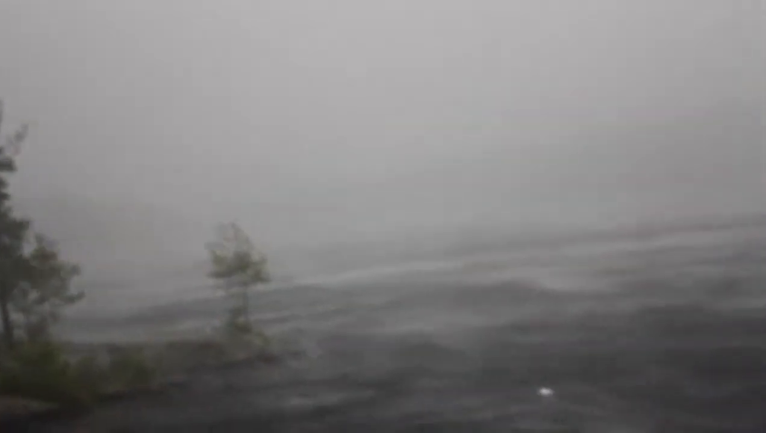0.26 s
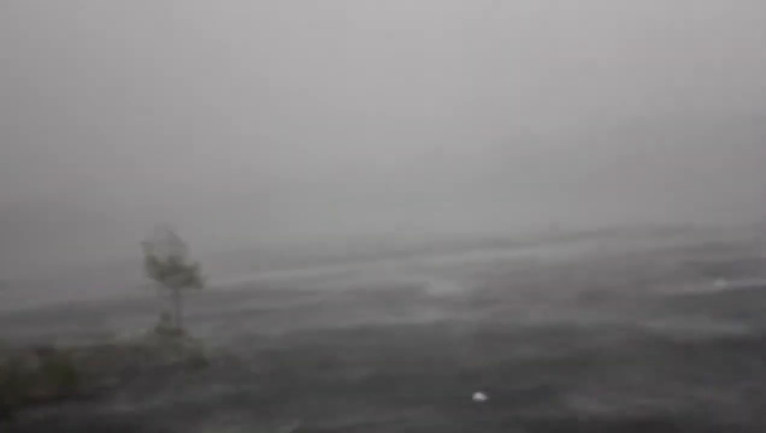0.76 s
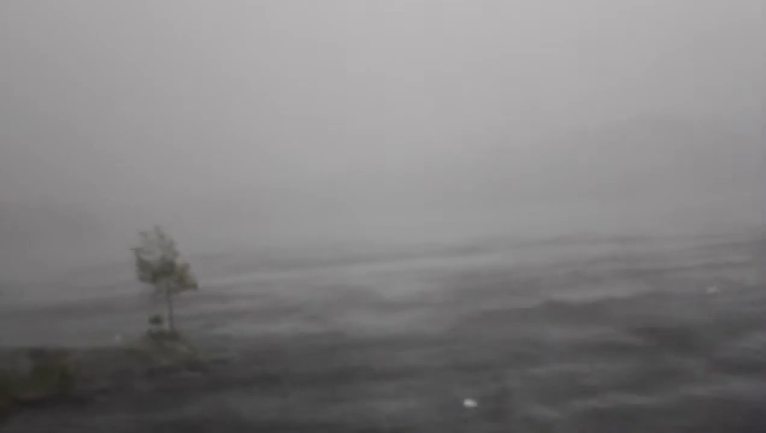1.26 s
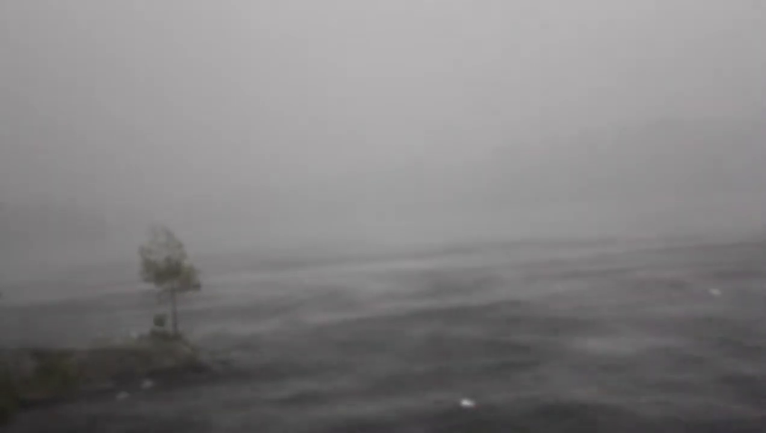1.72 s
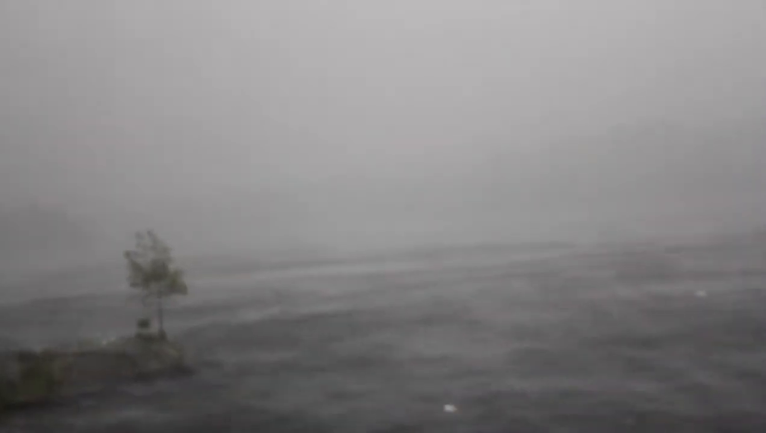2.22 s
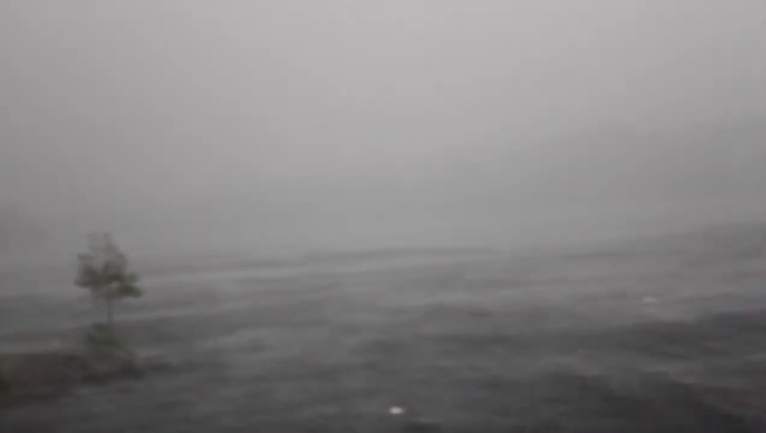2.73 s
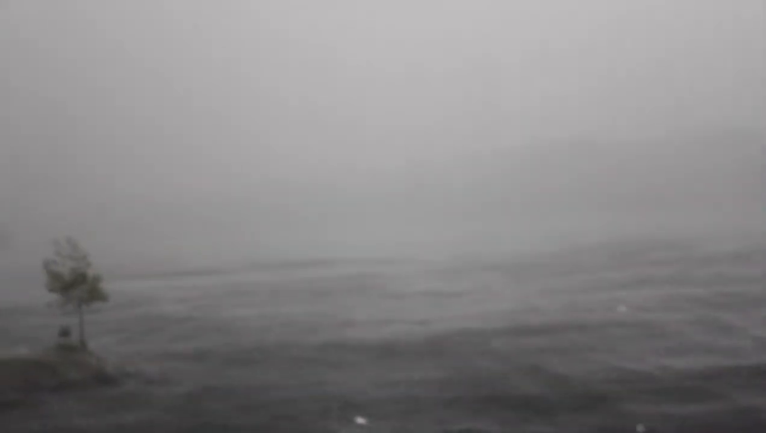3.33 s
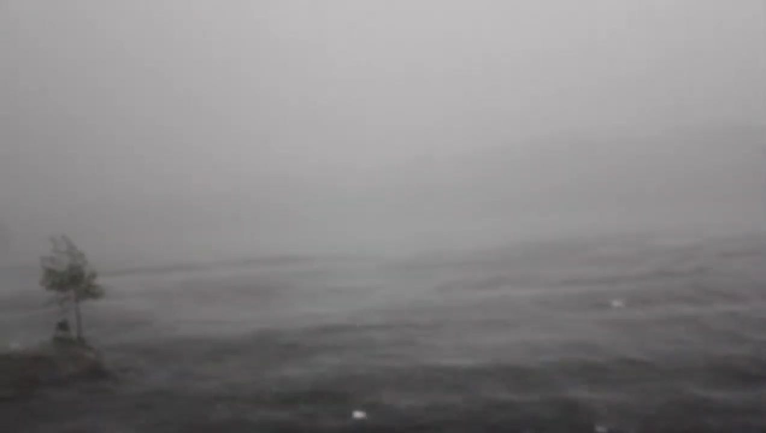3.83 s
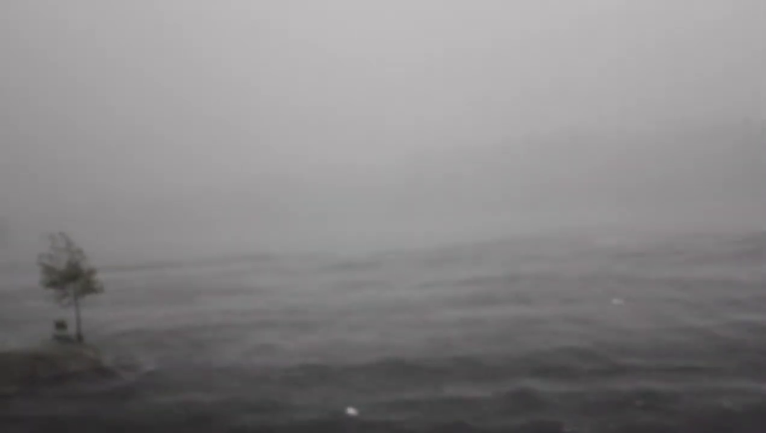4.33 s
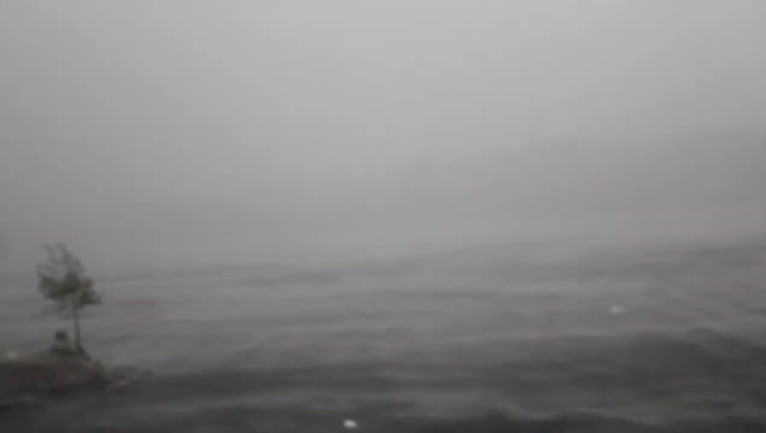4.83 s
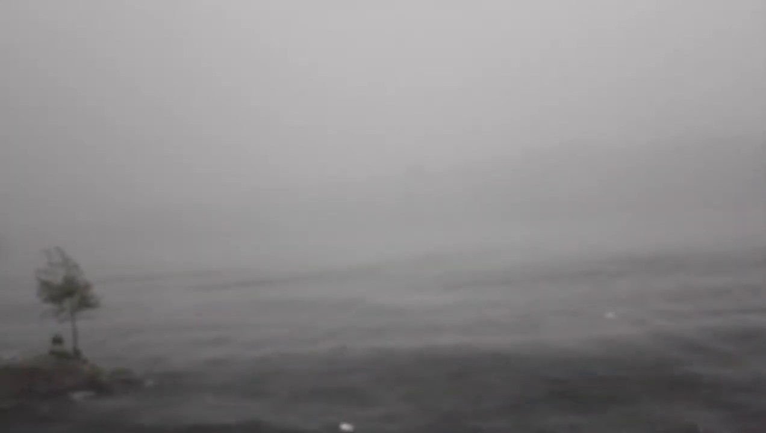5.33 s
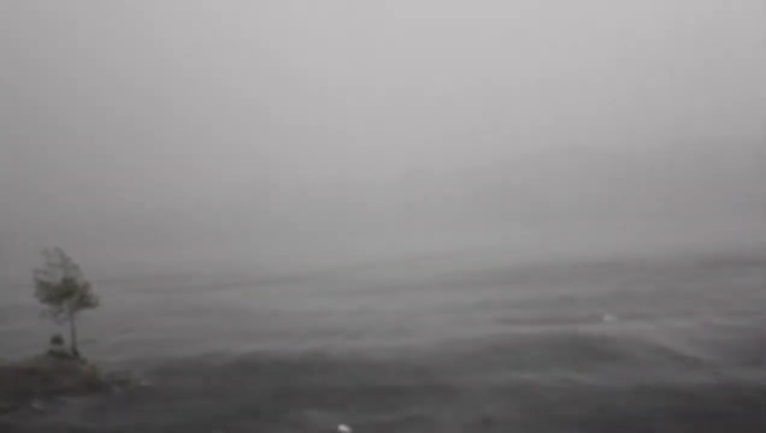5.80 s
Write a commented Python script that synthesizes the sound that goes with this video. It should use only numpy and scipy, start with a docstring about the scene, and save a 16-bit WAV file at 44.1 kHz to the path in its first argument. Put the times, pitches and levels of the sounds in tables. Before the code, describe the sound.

A bright, dense downpour comes in uneven sheets, with hard wet ticks near a single sheltered microphone. Low thunder bumps from the start, grows quickly and keeps rumbling, boomy with a rough muffled rattle. At about three seconds the rain falls away to a faint hiss with sparse tiny ticks, leaving thunder in front, rising and falling until the end without a final clap.

```python
"""Heavy, gusty rain opens loud, with a cluster of near drops ticking in the first second. Thunder starts low,
thumps from the outset and swells from about 0.8 s; sparser drops return after 2 s. Around 3 s the rain is heard
well back under the thunder, which rolls on in swells to the end. Rain is shaped noise with ringing impulses,
near drops are cracks with spray, thumps are short swings of pressure, and thunder is random shock fronts plus
noise in three bands. One microphone feeds both channels."""
import sys
import numpy as np
from scipy import signal
from scipy.fft import rfft, irfft, next_fast_len
from scipy.io import wavfile

SR = 44100
rng = np.random.default_rng(int(sys.argv[2]) if len(sys.argv) > 2 else 0)


def generate_wav(sig):
    """Save sig (samples, or channels by samples) to the path in sys.argv[1] as 16-bit PCM at SR."""
    pcm = np.round(np.clip(np.atleast_2d(sig).T, -1, 1) * 32767).astype(np.int16)
    wavfile.write(sys.argv[1], SR, pcm)


N = 267246  # length in samples

# Level at which the rain is heard: t/s, level/dB
RAIN_LEVEL = [(0.0, -17.5), (0.15, -21), (0.19, -24.5), (0.41, -17.5), (0.5, -22), (0.6, -21),
              (0.66, -20.5), (0.73, -19), (0.8, -21), (0.95, -23), (1.16, -21), (1.28, -27.5), (1.5, -24),
              (1.97, -24), (2.12, -20.5), (2.36, -24.5), (2.5, -21), (2.6, -28.5), (2.95, -24), (3.04, -34),
              (3.14, -30.5), (3.2, -36), (3.33, -33), (3.4, -35.5), (3.8, -39), (4.0, -36), (4.22, -33.5),
              (4.56, -36), (4.74, -33.5), (5.0, -38.5), (5.08, -36), (5.67, -31.5), (5.77, -33),
              (6.06, -29)]
# Spectrum of the rain: f/Hz, density per Hz/dB
RAIN_SPECTRUM = [(150, -20), (400, -17.5), (1000, -1.5), (2000, -3), (3500, -3.5), (5500, -5), (7500, -7),
                 (12000, -7), (15500, -11)]
# Near drops: start t/s, crack level/dB, ring f/Hz, ring level over the crack/dB
NEAR_DROPS = [(0.013, -8, 3600, 0), (0.0686, -7, 5210, -3), (0.154, 2, 4040, -7), (0.1585, 2, 4200, -10),
              (0.3969, -11, 3990, 0), (0.419, -2, 3300, -9), (0.5346, -13.5, 2900, 7),
              (0.5803, -1, 3820, -4), (0.602, -7, 7010, 3), (0.721, -2, 3820, -1), (0.738, -4, 6000, -1),
              (0.79, -12, 4480, -6), (0.9063, 0, 8480, -4), (0.9194, -6, 12000, 1),
              (2.1265, -19, 3060, -10), (2.4612, -13, 3750, 0), (2.5096, -13, 3960, 3),
              (2.547, -2, 4090, -5), (2.674, -16, 3590, 7.5), (2.785, -8, 4060, -2),
              (3.0938, -22, 5570, -2), (3.3656, -20, 4360, -4), (4.228, -12, 3110, -10),
              (4.6827, -12, 5040, -5), (4.8503, -21, 3910, -5), (5.0383, -26, 3150, 3.5),
              (5.044, -24, 4200, 6), (5.2315, -19, 5720, -4), (5.441, -14, 4340, -8)]
# Single shock fronts that stand out of the roll: t/s, level/dB, f/Hz, length/cycles
SHOCK_FRONTS = [(0.085, -5.5, 145, 1.75), (0.249, -9.5, 172, 1.34), (0.39, -10.5, 164, 1.6),
                (0.423, -6, 178, 2.4), (0.461, 3, 288, 1.8), (0.503, -10.5, 414, 2.5),
                (0.555, -9, 153, 1.35), (0.674, -7, 248, 1.2), (0.76, -10, 200, 4), (1.208, 1, 127, 1.5),
                (1.219, -13, 483, 2), (1.232, -2.5, 168, 3.9), (1.508, -13, 200, 2.3),
                (1.574, -14, 180, 2.5), (1.655, -10, 202, 7.5), (1.853, -9, 210, 8.9),
                (2.274, -8, 138, 1.4), (2.315, -10.5, 205, 9.2), (2.439, -10, 217, 5),
                (2.46, -11, 202, 4.2), (2.512, -5.5, 203.4, 6.6), (2.962, -5, 130, 3.3),
                (3.015, -1, 180, 3.2), (3.129, -5, 183, 3.5), (3.184, -5, 191, 3), (3.348, -3, 172, 1.7),
                (3.452, -12, 92, 2.5), (3.543, -9, 175, 2.5), (3.696, -5, 200, 2.4),
                (3.706, -11, 75.4, 3.6), (3.712, -7, 219, 5.3), (3.716, -9, 636, 2.4),
                (3.784, -12, 75, 1.8), (3.911, -3, 112, 1.6), (3.915, -33, 620, 2.3), (4.237, -7, 142, 3.9),
                (4.419, -9, 205, 4.5), (4.473, -11, 110, 3.3), (4.782, -7, 110, 2.4), (4.951, -6.5, 404, 4),
                (5.131, -11, 186, 1.5), (5.611, -10, 163, 2.5), (5.734, -9, 198, 2.9)]
# The roll of thunder: t/s, boom level/dB, rattle level/dB
THUNDER_ROLL = [(0.0, -34, -26.5), (0.2, -33.5, -31.5), (0.46, -26, -28.5), (0.68, -29.5, -30.5),
                (0.78, -17.5, -19), (1.11, -27, -22.5), (1.23, -16.5, -16), (1.29, -29.5, -27),
                (1.55, -19.5, -22.5), (1.85, -17.5, -21), (2.1, -26.5, -25.5), (2.17, -20.5, -17),
                (2.32, -18.5, -20), (2.4, -26, -26.5), (2.56, -21.5, -27.5), (2.62, -32, -31.5),
                (2.9, -23, -22), (2.99, -14, -17), (3.09, -17.5, -20), (3.16, -17, -16.5),
                (3.55, -15, -16.5), (3.67, -23, -20), (3.74, -18, -18), (4.02, -23.5, -23.5),
                (4.18, -21, -20.5), (4.25, -14.5, -17.5), (4.52, -18.5, -21), (4.59, -22, -22),
                (4.82, -16.5, -16), (5.04, -21, -20.5), (5.14, -15.5, -20), (5.42, -18.5, -20),
                (5.72, -14.5, -19.5), (5.79, -24.5, -23), (5.92, -18.5, -19), (6.06, -24, -23.5)]
# Slow change of colour: t/s, rumble level over the boom/dB, nearness that brightens the rattle/0-1
THUNDER_REACH = [(0, -3.5, 0.5), (.8, -11, 0.56), (1.2, -4.5, 0.37), (1.8, -12.5, 0.46), (2.3, -3, 0.68),
                 (3.0, -9.5, 0.34), (3.8, -3, 0.29), (4.5, -5.5, .25), (5.3, -8, 0.27), (6.06, -10.5, .35)]
# Spectra of the three thunder bands: f/Hz, density per Hz/dB
RUMBLE_SPECTRUM = [(18, -48), (30, -18.5), (72, 6.5), (120, 7.5), (160, 1.5), (260, -120)]
BOOM_SPECTRUM = [(59, -35), (100, -1.5), (140, -7), (189, 8.5), (252, 3), (370, -9.5), (480, -34.5),
                 (810, -120)]
RATTLE_SPECTRUM = [(190, -39), (330, -1.5), (460, -3), (714, -4), (932, -11), (1420, -15.5), (2400, -32.5),
                   (3120, -44), (5280, -120)]

DROP_SPRAY = 0.52  # greatest spray tick against the crack
# The hollow around the microphone rings with the boom
SHELTER_HZ, SHELTER_CYCLES, SHELTER_DB = 192.2, 22, -13.5
# Random level movement of each thunder band: spread in dB, corner rate in Hz
RUMBLE_WANDER_DB, RUMBLE_WANDER_HZ = 2.2, 4.5
BOOM_HEAVE_DB, BOOM_HEAVE_HZ = 0.8, 12
RATTLE_HEAVE_DB, RATTLE_HEAVE_HZ = 0.82, 8.8
CUTOFF_HZ = 15250  # top of the microphone's range


def from_db(db):
    """Decibels become an amplitude factor."""
    return 10 ** (np.asarray(db) / 20)


def rms_one(x):
    """Scales a signal to an rms of 1."""
    return x / np.sqrt(np.mean(x ** 2) + 1e-20)


def in_time(rows):
    """Draws each column of a timed table as a curve with one value per sample."""
    times, *columns = np.transpose(rows)
    return [np.interp(np.arange(N) / SR, times, column) for column in columns]


def drift(rate_hz):
    """Low-passed noise of rms 1: a random movement that slows above its corner rate."""
    step = 40  # samples between drawn points
    pole = np.exp(-2 * np.pi * rate_hz * step / SR)
    noise = rng.standard_normal(N // step + 2002)
    slow = signal.lfilter([1], [1, -2 * pole, pole * pole], noise)[2000:]  # skip the settling
    return np.interp(np.arange(N) / step, np.arange(len(slow)), rms_one(slow))


def colour(x, spectrum):
    """Filters a white signal to a spectrum drawn over log frequency; rms 1."""
    size = next_fast_len(N)
    hz, db = np.transpose(spectrum)
    grid = np.maximum(np.arange(size // 2 + 1) * SR / size, 1)
    gain = from_db(np.interp(np.log(grid), np.log(hz), db, left=-90, right=-90))
    return rms_one(irfft(rfft(x, size) * gain, size)[:N])


def clicks(per_s, spread_db):
    """Random impulses of either sign, mostly small and a few large; rms 1."""
    size_db = spread_db * np.minimum(rng.exponential(1, N), 5)
    sizes = from_db(size_db) * rng.choice([-1, 1], N)
    return rms_one(sizes * (rng.random(N) < per_s / SR))


def tick(impulses, hz, cycles):
    """A resonance rings at hz after each impulse and dies 60 dB in the given cycles."""
    decay = from_db(-60 * hz / (cycles * SR))  # per sample
    turn = 2 * np.pi * hz / SR
    feedback = [1, -2 * decay * np.cos(turn), decay * decay]
    return signal.lfilter([0, np.sin(turn)], feedback, impulses + 1e-18)


def highpass(x, order, hz):
    """Keeps what lies above hz."""
    return signal.sosfilt(signal.butter(order, hz, "high", fs=SR, output="sos"), x)


def rain_crackle():
    """Nearer drops ring for a few cycles, each dealt one of twelve pitches."""
    pitches = np.geomspace(1800, 14000, 12)  # Hz
    hits = clicks(1500, spread_db=2.5)
    dealt = rng.integers(0, len(pitches), N)
    crackle = np.zeros(N)
    for k, hz in enumerate(pitches):
        crackle += tick(hits * (dealt == k), hz, cycles=4.0) * np.sqrt(hz)
    return rms_one(crackle)


def rain_hiss():
    """Far drops blend into noise, which bursts for a few ms at each splash."""
    splashes = clicks(70, spread_db=2.5)
    spatter = signal.lfilter([.01], [1, -.992], np.abs(splashes))
    return rng.standard_normal(N) * (1 + 1.7 * spatter)


def rain():
    """Hiss and crackle share one spectrum and come in sheets with the gusts."""
    level_db, = in_time(RAIN_LEVEL)
    gusts_db = 0.48 * drift(16)
    sheet = colour(rain_hiss() + 0.29 * rain_crackle(), RAIN_SPECTRUM)
    # fine spray comes and goes apart from the heavier drops
    spray = 0.097 * drift(10) * highpass(sheet, 1, 7000)
    return from_db(level_db + gusts_db) * (sheet + spray)


def drops():
    """A near drop cracks, rings briefly where it lands and scatters spray ticks for some milliseconds."""
    out, length = np.zeros(N), 400  # samples in a burst
    fading = from_db(-18 * np.arange(length) / length)
    for s, db, hz, ring_db in NEAR_DROPS:
        chance, size = rng.random((2, length))
        impulses = (chance < .12) * (2 * size - 1) * fading * DROP_SPRAY
        impulses[40] = 1  # the crack, just under 1 ms after the start
        crack = np.diff(impulses, prepend=0)
        burst = crack + from_db(ring_db) * tick(impulses, hz, cycles=9.1)
        at = round(s * SR)
        out[at:at + length] += from_db(db) * burst[:N - at]
    return out


def thumps():
    """A shock front arrives rounded into a few swings of pressure, steeper than a sine."""
    out, t = np.zeros(N), np.arange(2400) / SR
    for s, db, hz, cycles in SHOCK_FRONTS:
        turn = 2 * np.pi * hz * t
        envelope = np.sin(np.pi * np.minimum(t * hz / cycles, 1)) ** 2
        swing = np.sin(turn) + 0.15 * np.sin(2 * turn) + 0.16 * np.sin(3 * turn)
        at = round(s * SR)
        out[at:at + len(t)] += from_db(db) * envelope * swing
    return out


def thunder_rumble(fronts, level_db):
    """The deepest band of fronts and scattered sound wanders about its level."""
    rumble = colour(fronts + 0.79 * rng.standard_normal(N), RUMBLE_SPECTRUM)
    return rumble * from_db(level_db + RUMBLE_WANDER_DB * drift(RUMBLE_WANDER_HZ))


def thunder_boom(fronts, level_db):
    """The middle band heaves at random and sets the hollow around the microphone ringing."""
    boom = colour(fronts + 0.8 * rng.standard_normal(N), BOOM_SPECTRUM)
    ring = rms_one(tick(boom, SHELTER_HZ, SHELTER_CYCLES))
    boom = rms_one(boom + from_db(SHELTER_DB) * ring)
    return boom * from_db(level_db + BOOM_HEAVE_DB * drift(BOOM_HEAVE_HZ))


def thunder_rattle(fronts, level_db, nearness):
    """The upper band heaves too; air absorbs its top from far stretches of the channel."""
    rattle = colour(fronts + 2.0 * rng.standard_normal(N), RATTLE_SPECTRUM)
    rattle = rattle + (3.43 * nearness - 1) * highpass(rattle, 2, 900)
    return rattle * from_db(level_db + RATTLE_HEAVE_DB * drift(RATTLE_HEAVE_HZ))


def thunder():
    """Fronts from all along the crooked channel pile up; scattered sound fills the gaps between them."""
    boom_db, rattle_db = in_time(THUNDER_ROLL)
    rumble_db, nearness = in_time(THUNDER_REACH)
    fronts = clicks(500, spread_db=1.0)
    clumps_db = 0.34 * drift(41)  # quick flutter shared by boom and rattle
    rumble = thunder_rumble(fronts, boom_db + rumble_db)
    boom = thunder_boom(fronts, boom_db + clumps_db)
    rattle = thunder_rattle(fronts, rattle_db + 1.4 * clumps_db, nearness)
    return rumble + boom + rattle


def scene():
    """Rain, drops, thumps and thunder add up, the same in both channels."""
    return np.tile(rain() + drops() + thumps() + thunder(), (2, 1))


def record(dry):
    """The microphone drops the deepest bass, peaks near full scale are rounded, the top is cut."""
    thin = highpass(dry, 4, 38)
    rounded = thin / (1 + np.abs(thin) ** 6) ** (1 / 6)
    top_cut = signal.ellip(10, .5, 75, CUTOFF_HZ, fs=SR, output="sos")  # .5 dB ripple, 75 dB down
    return signal.sosfilt(top_cut, rounded)


dry = scene()
out = record(dry)
generate_wav(out)
```